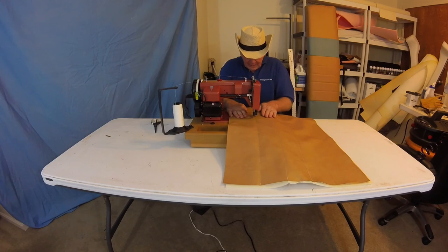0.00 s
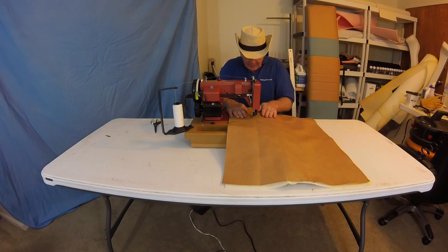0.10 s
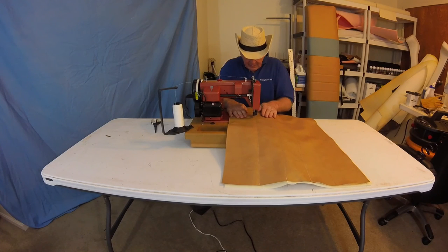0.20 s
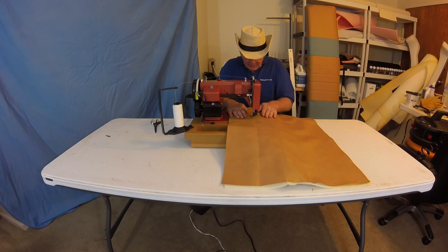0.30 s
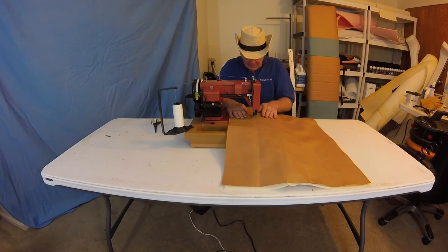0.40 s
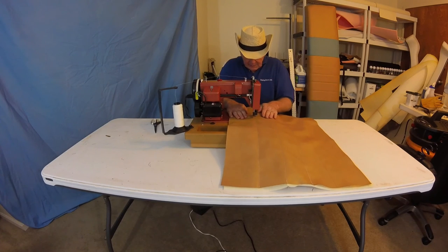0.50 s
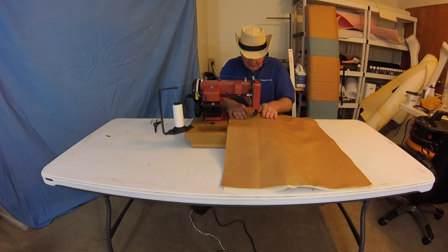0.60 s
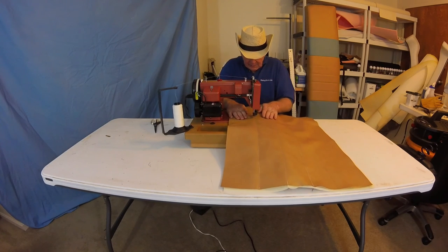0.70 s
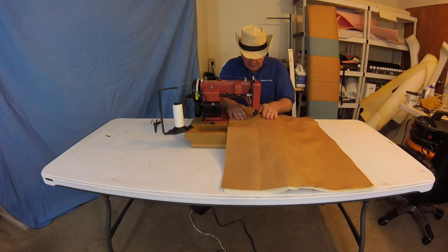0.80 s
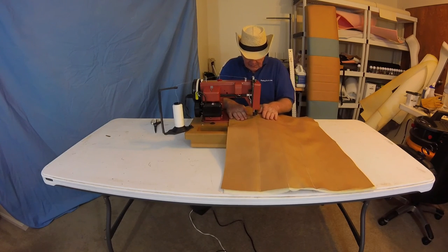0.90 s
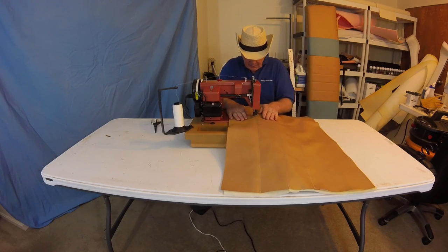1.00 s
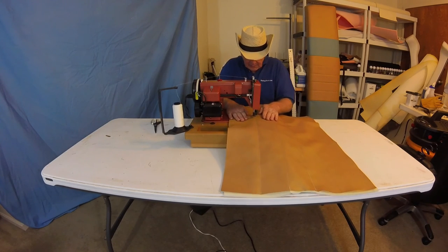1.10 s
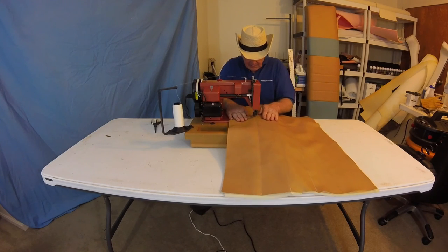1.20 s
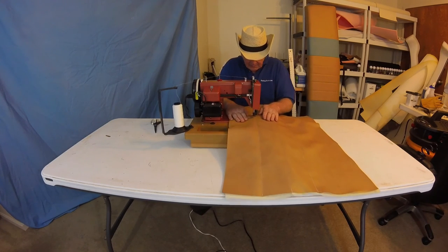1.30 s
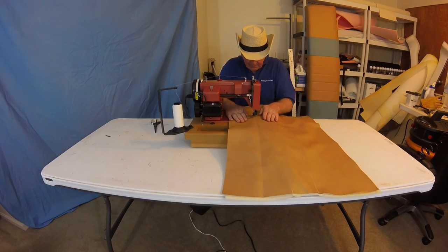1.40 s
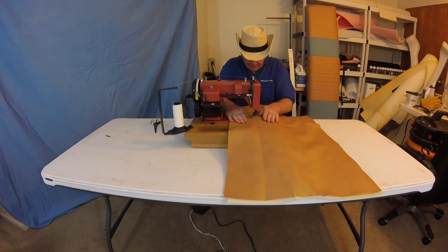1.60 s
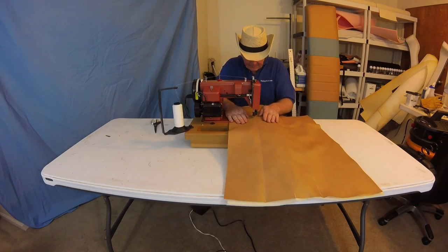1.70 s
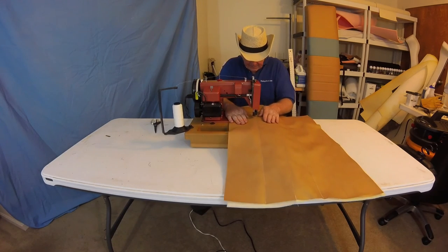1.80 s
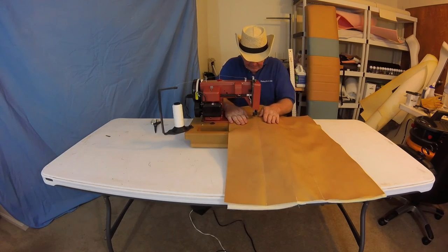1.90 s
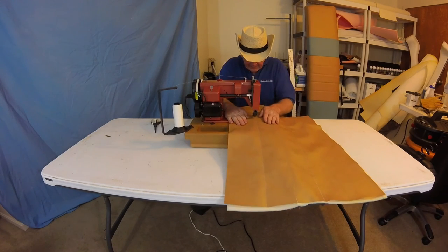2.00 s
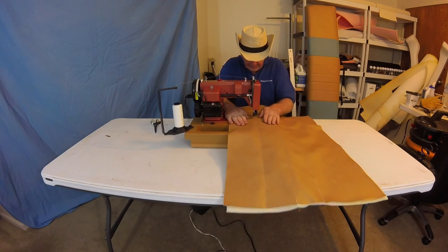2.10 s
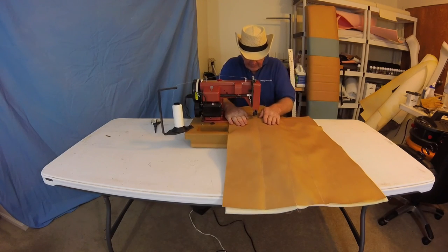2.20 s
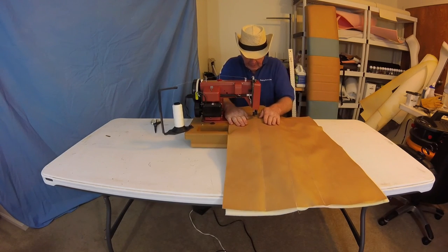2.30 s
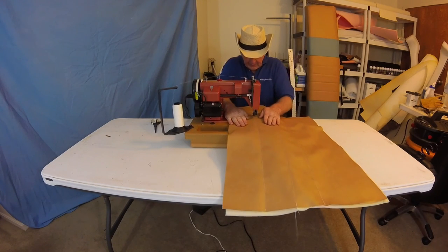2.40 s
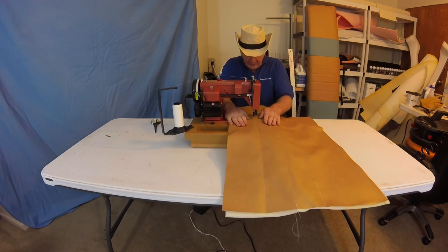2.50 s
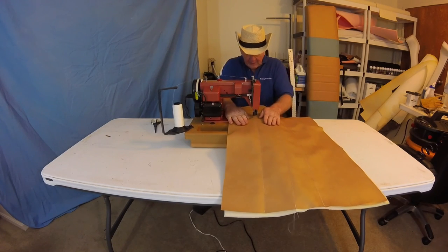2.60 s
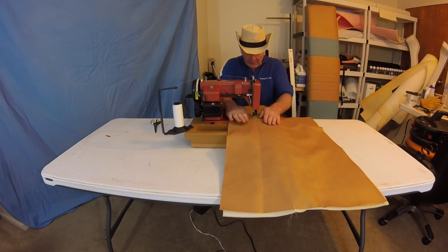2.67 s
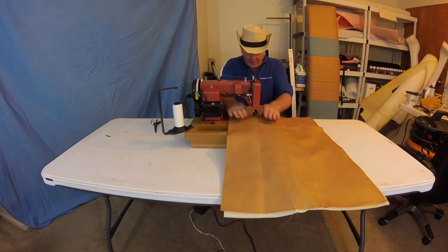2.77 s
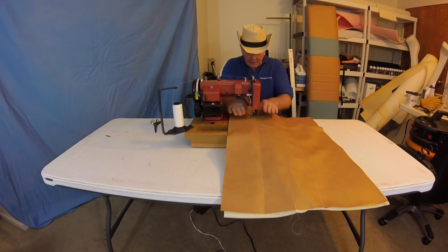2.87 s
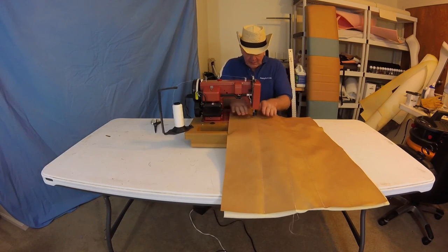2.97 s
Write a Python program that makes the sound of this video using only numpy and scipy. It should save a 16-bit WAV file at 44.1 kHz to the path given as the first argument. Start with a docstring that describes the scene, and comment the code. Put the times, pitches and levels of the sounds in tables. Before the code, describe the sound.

Heavy-duty sewing machine stitching one quick burst, motor whining and body clattering, in a small workshop

```python
"""Room air and mains hum come first; then, across a workshop, a heavy sewing machine runs up,
stitches at full speed and coasts to a stop, with soft thuds as it settles.
Belt, gears and linkage rattle the cast body and table: random impacts, knocks and gear noise ring
a resonant filter. The motor adds brush hiss, commutator whine and tones locked to its shaft.
A short room tail follows the machine; the sound is almost mono."""
import sys
import numpy as np
from scipy import signal
from scipy.fft import rfft, irfft, next_fast_len
from scipy.io import wavfile
from scipy.ndimage import uniform_filter1d

SR = 44100
rng = np.random.default_rng(int(sys.argv[2]) if len(sys.argv) > 2 else 0)


def gain_from_db(level_db):
    """Convert decibel levels to linear amplitude factors (20 dB per decade)."""
    decades = np.asarray(level_db, float) / 20
    return 10 ** decades


def put_to_file(sound):
    """Save the sound as 16-bit audio at rate SR, in the file named by the first command-line argument."""
    columns = np.atleast_2d(sound).T  # one column per channel
    safe = np.clip(columns, -1, 1)
    whole_steps = np.round(safe * 32767)
    wavfile.write(sys.argv[1], SR, whole_steps.astype(np.int16))


N = 134505

# course of the run: (t/s, relative linkage rattle level/dB, relative motor effort level/dB)
RUN = [(.1, -69, -81), (.16, -57, -64), (.22, -53, -61), (.27, -44, -53.5), (.38, -34.5, -45),
       (.54, -31, -42.5), (.75, -29, -37.5), (1.0, -29.5, -37.5), (1.2, -28, -37.5), (1.55, -29.5, -38.5),
       (1.9, -28.5, -37.5), (2.2, -33, -38.5), (2.28, -31, -39.5), (2.45, -33.5, -45.5),
       (2.6, -42.5, -49.5), (2.72, -47.5, -56.5), (2.86, -53, -62), (2.91, -68, -68), (2.96, -88, -69)]


def evened(x):
    """Scales a signal to an rms of one."""
    return x / np.sqrt(np.mean(x ** 2) + 1e-20)


def slow(hz):
    """Low-passed noise of unit rms: a chance motion up to about hz."""
    noise = rng.standard_normal(N + SR)
    low_pass = signal.butter(2, hz / (SR / 2))
    return evened(signal.lfilter(*low_pass, noise)[SR:])  # the filter's first second is dropped


def colour(x, points, rings=(), ring_db=0):
    """Minimum-phase filter: a smooth spectrum plus fixed resonances of total power ring_db."""
    size = next_fast_len(N + 8192)
    hz = np.fft.rfftfreq(size, 1 / SR)
    f, db = np.transpose(points)
    power = gain_from_db(np.interp(np.log(hz + 1), np.log(f + 1), db)) ** 2
    power /= power.sum()
    if len(rings):
        peaks = sum(gain_from_db(d) ** 2 / (1 + (2 * (hz - c) / w) ** 2) for c, w, d in rings)
        power += gain_from_db(ring_db) ** 2 * peaks / peaks.sum()
    log_gain = np.log(power + 1e-22) / 2
    # folding the cepstrum onto positive time gives the minimum phase
    cepstrum = irfft(log_gain, size)
    cepstrum[1:size // 2] *= 2
    cepstrum[size // 2 + 1:] = 0
    response = np.exp(rfft(cepstrum))
    return irfft(rfft(x, size) * response, size)[:N] * np.sqrt(size / 2)


def air():
    """Room air as coloured noise, mains hum as steady sines."""
    # room air spectrum: (f/Hz, relative level per Hz/dB)
    air_spectrum = [(12, -28), (20, 3), (69, -6.5), (168, -13), (790, -25), (1040, -24), (1760, -32),
                    (3820, -36), (6830, -45.5), (13600, -53.5), (14800, -70)]
    # mains hum lines: (f/Hz, rms level/dB)
    hum_lines = [(118.4, -57), (236.9, -60), (360.7, -71.5), (479.1, -71), (597.5, -79)]
    air_db = -49  # rms
    t = np.arange(N) / SR
    hum = 0
    for hz, db in hum_lines:
        hum = hum + gain_from_db(db) * np.sqrt(2) * np.sin(2 * np.pi * (hz * t + rng.random()))
    return gain_from_db(air_db) * evened(colour(rng.standard_normal(N), air_spectrum)) + hum


def control(index):
    """One level column of the run, in dB, as a curve over samples."""
    run = np.array(RUN)
    return np.interp(np.arange(N) / SR, run[:, 0], run[:, index])


def running():
    """Fades the machine in before the run and out after it."""
    start, stop = RUN[0][0], RUN[-1][0]
    return np.interp(np.arange(N) / SR, [start - .04, start, stop, stop + 0.048], [0, 1, 1, 0])


def shaft():
    """Motor shaft speed in Hz, and its running count of turns with a slight random wobble."""
    # mean shaft speed: (t/s, f/Hz)
    speed = [(.1, 25), (.25, 72), (.36, 101), (.44, 119), (.56, 139), (.75, 143.5), (.86, 166), (.94, 174),
             (1.01, 175.9), (1.24, 180.6), (1.57, 182.1), (1.87, 182.5), (2.1, 181), (2.22, 176.5),
             (2.25, 168), (2.28, 144), (2.38, 141), (2.46, 126), (2.54, 95), (2.7, 76), (2.86, 62),
             (2.96, 20)]
    wobble = .0008  # rms share of the speed
    hz = np.interp(np.arange(N) / SR, *np.transpose(speed))
    return hz, np.cumsum(hz * (1 + wobble * slow(49.0))) / SR


def whine(turns, k, width_hz, db):
    """A narrow band of noise centred on multiple k of the turns."""
    a, b = slow(width_hz / 2), slow(width_hz / 2)
    phase = 2 * np.pi * k * turns
    return gain_from_db(db) * (a * np.cos(phase) + b * np.sin(phase))


def knocking():
    """Envelope of the needle bar and walking foot knocks: quick rise, short fall."""
    # knocks: (t/s, relative level/dB)
    knocks = [(.17, -45), (0.219, -30), (0.29, -25.5), (0.346, -26), (0.417, -26.5), (0.532, -30),
              (0.609, -25.5), (.702, -28.5), (0.828, -25.5), (0.978, -24.5), (1.055, -26.5), (1.17, -49),
              (1.34, -33.5), (1.432, -26), (1.56, -32), (1.638, -23.5), (1.773, -23.5), (1.84, -43),
              (1.9, -30), (1.979, -20), (2.005, -33), (2.087, -21.5), (2.115, -27), (2.199, -20.5),
              (2.309, -26), (2.375, -36), (2.528, -27), (2.577, -28.5), (2.64, -31), (2.7, -39),
              (2.765, -39), (2.815, -44), (2.87, -47)]
    rise_s, fall_s = 0.017, 0.015  # time constants
    t, out = np.arange(N) / SR, np.zeros(N)
    for s, db in knocks:
        u = np.maximum(t - s, 0)
        out += gain_from_db(db) * (1 - np.exp(-u / rise_s)) * np.exp(-u / fall_s)
    return out


def linkage(turns):
    """Dense small impacts, gear whine and the knocks ring the cast body and the table."""
    # body and table spectrum: (f/Hz, relative level per Hz/dB)
    body = [(35, -62), (60, -16), (108, -5.5), (172, -12), (355, -3), (593, -3.5), (710, -1), (826, -3),
            (1190, -7), (1680, -37), (2200, -23.5), (2860, -46), (4840, -120)]
    # body and table resonances: (f/Hz, width/Hz, relative level/dB)
    body_rings = [(134, 9.9, -10.5), (249, 23.6, -0.5), (366, 21, 0), (513, 16, -1), (641, 9.3, 0),
                  (730, 35, -2), (906, 13, -2), (995, 57, -4.5), (1105, 9.1, -2.5), (1136, 8.8, -2.5),
                  (1378, 48, -12)]
    # rough gear whines that glide with the shaft: (multiple of shaft speed, width/Hz, relative level/dB)
    gear_whines = [(11.5, 300, -14), (17, 250, -14), (9.6, 50, -20)]
    body_ring_db = -4.5  # all resonances against the smooth spectrum
    rattles_per_s, rattle_spread_db = 5000, 1.5
    take_up_s, soft_hz = .28, (330, 850)
    gear_surge_db, gear_surge_hz = 1.8, 14  # rms swing and upper rate
    rumble_db, rumble_hz = -25, 44.4  # level against the rattle control, upper edge

    strength = rng.standard_normal(N) * gain_from_db(rattle_spread_db * rng.exponential(1, N))
    ticks = evened(strength * (rng.random(N) < rattles_per_s / SR))
    # slow first impacts make a narrow growl, which opens to the full rattle
    soft = signal.lfilter(*signal.butter(2, soft_hz, "bandpass", fs=SR), ticks)
    hard = np.clip((np.arange(N) / SR - RUN[0][0]) / take_up_s, 0, 1) ** 2
    impacts = soft + hard * (ticks - soft)

    level = gain_from_db(control(index=1)) * running()
    rattle = impacts * np.hypot(level * gain_from_db(-3), 2 * knocking())
    surge = gain_from_db(gear_surge_db * slow(gear_surge_hz))
    gears = level * surge * sum(whine(turns, *row) for row in gear_whines)

    rumble_shape = [(20, 0), (rumble_hz, 0), (rumble_hz * 1.2, -30), (20000, -90)]
    rumble = colour(rng.standard_normal(N), rumble_shape) * level * gain_from_db(rumble_db)
    return colour(rattle + gears, body, body_rings, body_ring_db) + rumble


def brush_hiss(effort):
    """Brush and fan noise through the resonant case, throbbing and swelling with the knocks."""
    # brush and fan spectrum: (f/Hz, relative level per Hz/dB)
    whirr = [(760, 2), (1300, -1.5), (1680, -15.5), (2210, -0.5), (2420, -5.5), (4230, -8), (5690, -15.5),
             (6230, -13.5), (6900, -16.5), (8200, -9.5), (9270, -20), (11800, -22), (14800, -30)]
    # motor case resonances: (f/Hz, width/Hz, relative level/dB)
    case_rings = [(2260, 170, 3.5), (2594, 60, 3.5), (2783, 78, 3.5), (3050, 73, 1.5), (3310, 52, 0.5),
                  (5300, 130, -4), (6180, 280, -4), (7550, 140, -12), (7860, 170, -8), (8210, 60, -24),
                  (10100, 280, -18), (11800, 270, -17)]
    case_ring_db, throb_db = -8.5, 0.75  # resonances against smooth spectrum; rms swing
    throb = gain_from_db(throb_db * slow(18)) * (1 + 6.6 * knocking())
    return colour(rng.standard_normal(N) * throb * effort, whirr, case_rings, case_ring_db)


def commutator_whine(turns, effort):
    """A rough band of noise gliding with the shaft, radiated by the motor case."""
    # whine: (multiple of shaft speed, width/Hz, relative level/dB)
    bar_whine = (24, 260, -17)
    # how well the case radiates it: (f/Hz, relative level/dB)
    case_voice = [(1500, -22), (2000, -10), (2250, -3), (2500, -4), (2850, 2), (2980, -2), (3070, 0),
                  (3200, -4), (3410, 2), (3560, -12), (4100, -12), (4400, -14), (5000, -40)]
    coast_s, coast_db = 2.24, -2  # the whine drops when the pedal lifts
    coast = np.where(np.arange(N) / SR > coast_s, gain_from_db(coast_db), 1)
    return colour(whine(turns, *bar_whine) * effort * coast, case_voice)


def shaft_orders(hz, turns):
    """Wavering shaft multiples and singing case modes, all rising steeply with shaft speed."""
    # shaft orders: (multiple of shaft speed, relative level/dB)
    orders = [(2, -56), (3, -42), (6, -50), (10, -60), (11, -55), (11.3, -54)]
    # narrow case modes that sing at full speed: (f/Hz, width/Hz, relative level/dB)
    singing = [(2805, 14, -56), (3070, 20, -62), (3410, 20, -58)]
    top_hz, order_slope = 182, 14.  # speed of unit gain, power of amplitude against speed
    waver_db = 2.5  # rms; half of it for the high orders
    load_share = 0.18  # part of the low orders' level that swells with each knock
    load = uniform_filter1d(knocking(), size=900)
    load = 1 - load_share + load_share * load / load[SR:2 * SR].mean()
    lines = 0
    for k, db in orders:
        if k < 10:
            waver = load * gain_from_db(waver_db * slow(8.1))
        else:
            waver = gain_from_db(waver_db / 2 * slow(9.9))
        tone = np.sqrt(2) * np.cos(2 * np.pi * (k * turns + rng.random()))
        lines = lines + waver * gain_from_db(db) * tone
    t = np.arange(N) / SR
    lines = lines + sum(whine(t, *row) for row in singing)  # fixed pitch: centred on Hz
    return lines * (hz / top_hz) ** order_slope


def tones(turns):
    """Shaft tones that swell and fade, three with a slight rough halo, the commutator mostly rough."""
    # drone, two gear whistles, commutator line: (multiple of shaft speed, halo width/Hz, halo share)
    toned_orders = [(4, 30, .2), (12, 30, .25), (12.6, 30, .25), (24, 60, 1.2)]
    # their levels as the load shifts:
    # (t/s, drone level/dB, low whistle level/dB, high whistle level/dB, commutator level/dB)
    swells = np.array([(.82, -60, -65, -65, -68), (.92, -42, -53, -60, -57), (.97, -34, -48, -60, -55),
                       (1.09, -34, -60, -58, -55), (1.17, -34, -46, -49, -53), (1.25, -43, -44, -42, -53),
                       (1.3, -34, -44, -46, -53), (1.36, -34, -60, -45, -52), (1.45, -32, -50, -52, -52),
                       (1.55, -35, -53, -53, -53), (1.59, -46, -56, -53, -52), (1.645, -31, -52, -54, -53),
                       (1.71, -46, -52, -54, -53), (1.79, -32, -53, -50, -52), (1.86, -33, -58, -52, -53),
                       (1.93, -45, -58, -49, -53), (2.0, -30, -58, -48, -52), (2.06, -44, -60, -45, -52),
                       (2.12, -30, -58, -49, -56), (2.17, -34, -60, -56, -57), (2.22, -30, -60, -60, -59),
                       (2.27, -50, -70, -70, -70)])
    t, out = np.arange(N) / SR, 0
    for k, (multiple, width_hz, share) in enumerate(toned_orders):
        clean = np.sqrt(2) * np.cos(2 * np.pi * (multiple * turns + rng.random()))
        tone = clean + share * whine(turns, multiple, width_hz, 0)
        level_db = np.interp(t, swells[:, 0], swells[:, k + 1], -120, -120)
        out = out + evened(tone) * gain_from_db(level_db)
    return out


def motor(hz, turns):
    """Brush hiss and commutator whine follow the effort; the orders and tones follow the shaft."""
    effort = gain_from_db(control(index=2)) * running()
    noise = brush_hiss(effort) + commutator_whine(turns, effort)
    return noise + tones(turns) + shaft_orders(hz, turns)


def thuds():
    """Soft low rings through the table as the machine settles: sines with a quick swell and decay."""
    # thuds: (t/s, f/Hz, envelope peak level/dB)
    table_thuds = [(2.585, 340, -34.5), (2.685, 262, -39), (2.923, 111, -50), (2.991, 111, -49)]
    fall_s = 0.014
    t, out = np.arange(N) / SR, 0
    for s, hz, db in table_thuds:
        u = np.maximum(t - s, 0)
        envelope = np.e * u / fall_s * np.exp(-u / fall_s)  # peaks at one
        out = out + gain_from_db(db) * envelope * np.sin(2 * np.pi * hz * u)
    return out


def room(x):
    """Workshop reflections: a sparse decaying tail, duller as it dies."""
    t60_s = .25  # dull part; the bright part dies in 0.39 of it
    t = np.arange(SR // 2) / SR
    taps = rng.choice([-1., 1.], len(t)) * (rng.random(len(t)) < .05) * (t > .006)
    dull = signal.lfilter([.4], [1, -.6], taps)
    bright = taps - dull
    tail = dull * gain_from_db(-60 * t / t60_s) + bright * gain_from_db(-60 * t / (0.39 * t60_s))
    return signal.fftconvolve(x, tail / np.linalg.norm(tail))[:N]


def stereo(mid):
    """Almost mono: a faint phase-scrambled copy is added left and subtracted right."""
    # side against mid, before side_db is added: (f/Hz, level/dB)
    apart = [(60, -33), (110, -33), (200, -30.5), (370, -32.5), (680, -33.5), (1260, -29.5), (2310, -27.5),
             (4250, -26), (7810, -24), (14400, -18)]
    side_db = 6
    f, _, z = signal.stft(mid, SR, nperseg=1024)
    at, db = np.transpose(apart)
    gain = gain_from_db(side_db + np.interp(np.log(f + 1), np.log(at), db))
    z = z * gain[:, None] * np.exp(2j * np.pi * rng.random(z.shape))
    side = signal.istft(z, SR, nperseg=1024)[1][:N]
    return np.array([mid + side, mid - side])


def scene():
    """The machine with its room tail, over hum and room air, in two nearly alike channels."""
    room_db = -14  # tail against direct sound
    hz, turns = shaft()
    machine = linkage(turns) + motor(hz, turns) + thuds()
    in_room = (machine + gain_from_db(room_db) * room(machine)) / np.hypot(1, gain_from_db(room_db))
    return stereo(in_room + air())


def top_cut(x):
    """Nothing passes above the cut-off."""
    return signal.sosfilt(signal.butter(12, 14950, fs=SR, output="sos"), x)


def record(dry):
    """Takes down the finished mix."""
    return top_cut(dry)


dry = scene()
out = record(dry)
put_to_file(out)
```